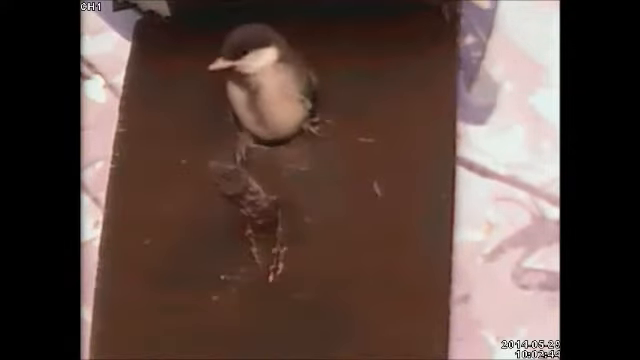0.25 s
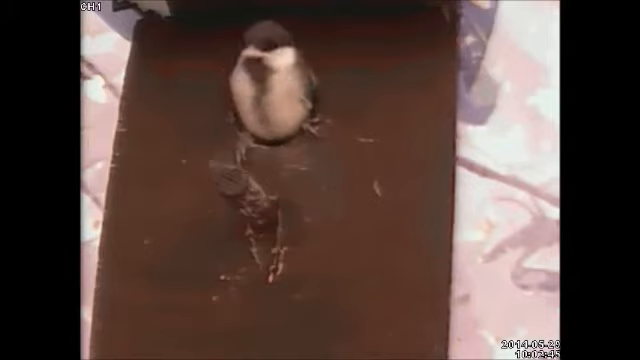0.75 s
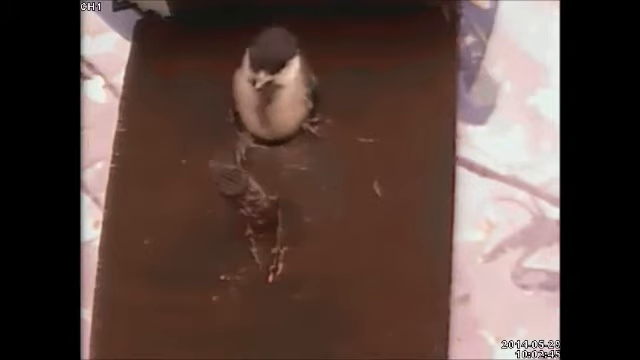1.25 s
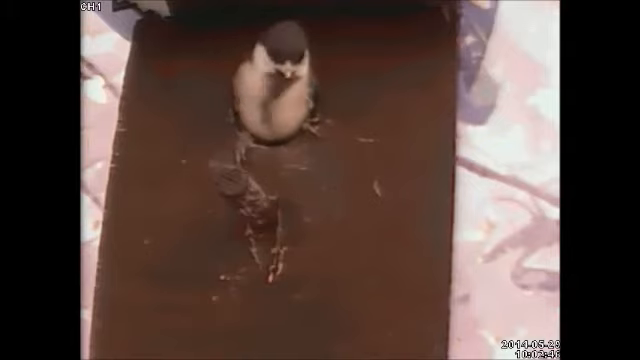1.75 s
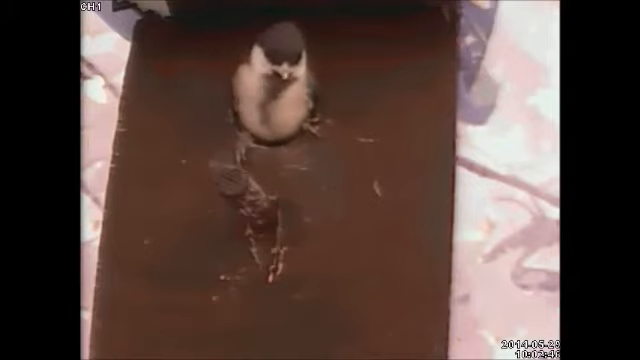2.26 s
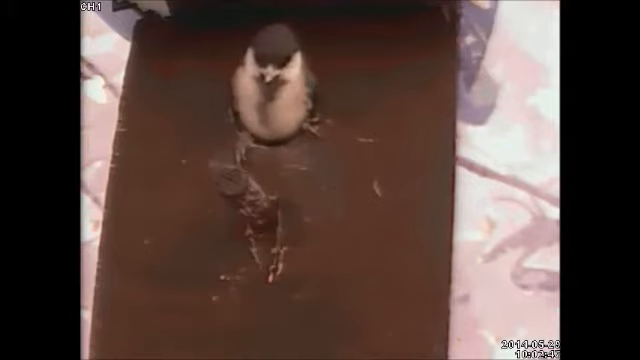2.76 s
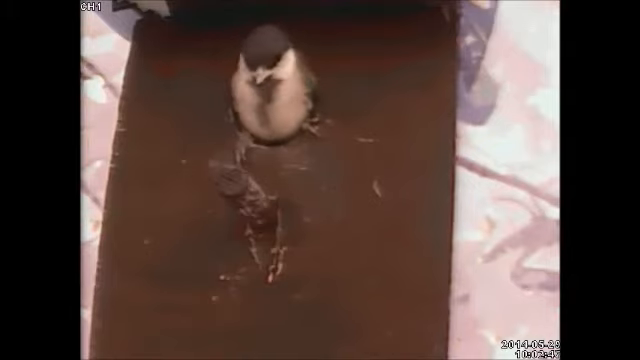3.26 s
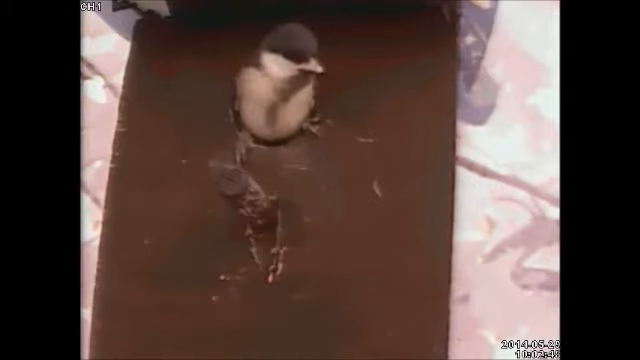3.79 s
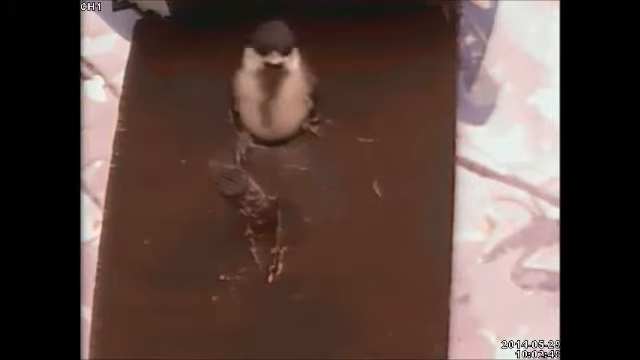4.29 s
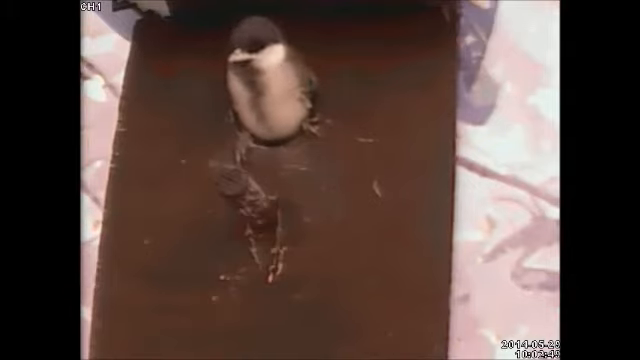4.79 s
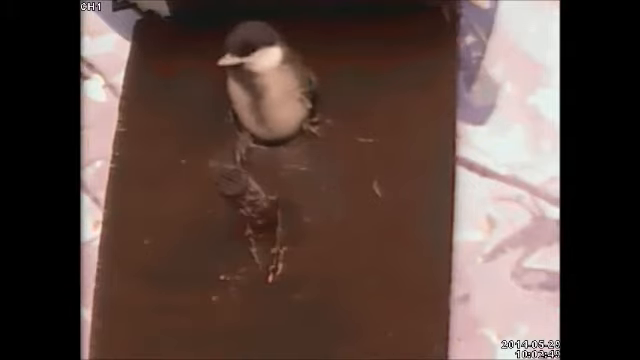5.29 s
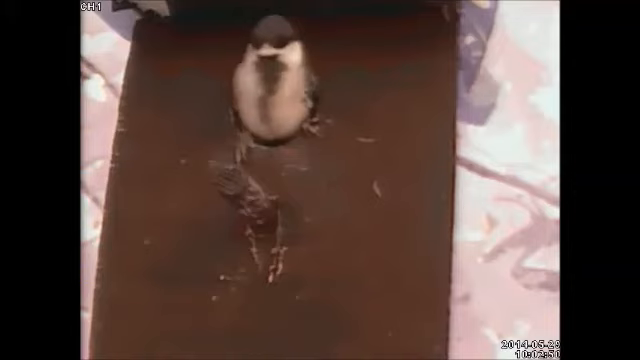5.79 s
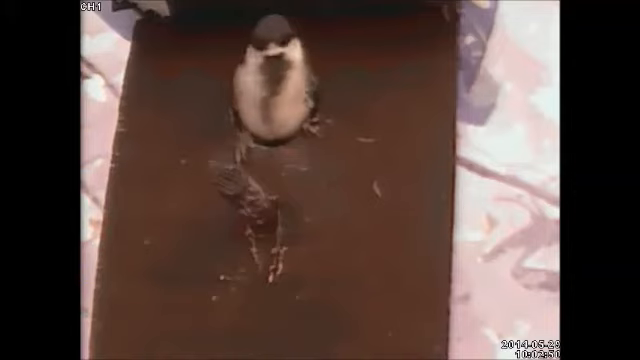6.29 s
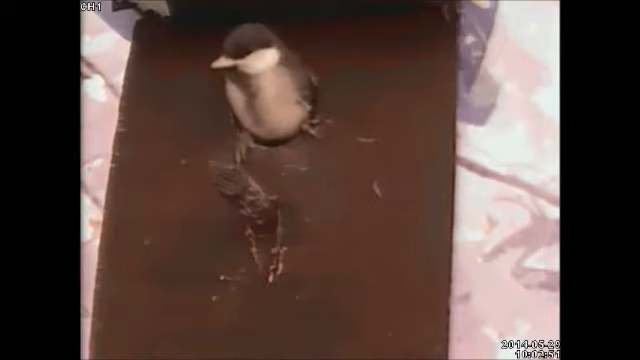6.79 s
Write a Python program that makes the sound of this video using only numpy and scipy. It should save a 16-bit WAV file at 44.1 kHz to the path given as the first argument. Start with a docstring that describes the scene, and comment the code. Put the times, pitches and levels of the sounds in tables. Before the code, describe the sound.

Close, raspy chattering from a small bird, twice, with light scuffs and claw clicks on wood, low rumble and faraway birdsong.

```python
"""A wooden nest box in a garden: a young great tit shuffles and gives two bursts of five harsh notes.
The two sides of its syrinx oscillate at different pitches, and their nonlinear coupling makes a buzz
of sum and difference tones. Claws click, feathers rustle and the beak snaps once.
The right microphone is inside the box, over a low rumble; the left one is outside, with distant birds,
faint air noise, mains hum and one metallic tap."""
import sys
import numpy as np
from scipy import signal
from scipy.fft import rfft, irfft
from scipy.io import wavfile
from scipy.ndimage import uniform_filter1d

SR = 44100
rng = np.random.default_rng(int(sys.argv[2]) if len(sys.argv) > 2 else 0)


def generate_wav(sig):
    """Save sig (samples, or channels by samples) to the path in sys.argv[1] as 16-bit PCM at SR."""
    pcm = np.round(np.clip(np.atleast_2d(sig).T, -1, 1) * 32767).astype(np.int16)
    wavfile.write(sys.argv[1], SR, pcm)


N = 310905
TREBLE_HZ, EDGE_HZ = 11900, 17000  # low-pass cutoffs: all but the beak snap; everything


def amp(db):
    """The decibel scale: 20 dB is a factor of ten in amplitude."""
    return 10 ** (np.asarray(db) / 20)


def unit(x):
    """Normalisation to rms 1."""
    return x / np.sqrt(np.mean(x ** 2) + 1e-20)


def gain_at(spectrum, hz):
    """Interpolation of a spectrum in dB along a log-frequency axis."""
    knots_hz, db = np.transpose(spectrum)
    return np.interp(np.log(abs(hz) + 1), np.log(knots_hz), db)


def add(mix, start_s, sound):
    """Superposition: a sound joins the mix at start_s."""
    part = mix[max(round(start_s * SR), 0):][:len(sound)]
    part += sound[:len(part)]


def noise(spectrum, size, treble_db=0):
    """Spectral shaping of white noise, with a treble shelf above 3 kHz; rms 1."""
    hz = np.fft.rfftfreq(size, 1 / SR)
    shelf_db = treble_db * hz ** 2 / (hz ** 2 + 3000 ** 2)
    return unit(irfft(rfft(rng.standard_normal(size)) * amp(gain_at(spectrum, hz) + shelf_db), size))


def wander(rate_hz, size):
    """Gaussian low-pass filtering turns noise into a smooth random curve of rms 1."""
    hz = np.fft.rfftfreq(size, 1 / SR)
    response = np.exp(-.5 * (hz / rate_hz) ** 2) * (hz > 0)
    return unit(irfft(rfft(rng.standard_normal(size)) * response, size))


def lowpass(x, hz):
    """Convolution with a windowed sinc: a steep low-pass on each channel."""
    taps = signal.firwin(255, hz, window=("kaiser", 8), fs=SR)
    return signal.oaconvolve(x, taps[None, :], "same", axes=-1)


# spectrum of the outdoor air: frequency_hz, relative_density_db
AIR_SPECTRUM = [(20, -18.5), (100, 0.5), (350, 1), (700, -1), (1500, -5.5), (3000, -10.5), (4200, -8.5),
                (6000, -13), (11500, -16.5), (12500, -47)]


def air(level_db=-58.5):
    """Stationary broadband noise: the faint hush outside."""
    return amp(level_db) * noise(AIR_SPECTRUM, N)


# spectrum of the rumble in the box: frequency_hz, relative_density_db
RUMBLE_SPECTRUM = [(10, -23), (28, -8), (65, -4.5), (100, 2), (140, 1.5), (185, -11), (260, -26.5),
                   (500, -36), (1000, -38.5), (1800, -44.5), (3000, -56), (8000, -60.5), (11500, -70.5),
                   (13000, -81)]


def rumble(level_db=-35.5, waver_db=.28):
    """Low-frequency noise under slight random amplitude modulation."""
    return amp(level_db + waver_db * wander(5.4, N)) * noise(RUMBLE_SPECTRUM, N)


# partials of the mains hum: harmonic_number, level_db
HUM_HARMONICS = [(1, -76.5), (2, -67), (3, -64), (4, -62.5), (5, -62.5), (6, -63.5), (7, -64.5), (8, -67),
                 (9, -66), (10, -68), (11, -72), (12, -77.5), (13, -82.5)]


def hum(mains_hz=49.95):
    """Electrical interference: the outside microphone's lead picks up mains harmonics."""
    cycles = mains_hz * np.arange(N) / SR
    partials = (amp(db) * np.sin(2 * np.pi * (k * cycles + rng.random())) for k, db in HUM_HARMONICS)
    return np.sqrt(2) * sum(partials)


def chirp(length_s, from_hz, to_hz, level_db, warble, bend=1, trill_hz=38, flutter_hz=150):
    """Frequency modulation: a far bird's warbling glide. A bend under 1 moves early, then lingers."""
    t = np.arange(0, length_s, 1 / SR)
    trill = .42 * np.sin(2 * np.pi * (trill_hz * t + rng.random()))
    flutter = .45 * wander(flutter_hz, SR)[:len(t)]
    glide_hz = from_hz * (to_hz / from_hz) ** ((t / length_s) ** bend)
    hz = glide_hz * (1 + warble * (trill + flutter))
    tone = np.sqrt(2) * np.sin(2 * np.pi * np.cumsum(hz) / SR)
    return amp(level_db) * tone * signal.windows.tukey(len(t), .4)


# one far bird's buzzy, falling call, about once a second: start_s, source_level_db
FALLING_CALLS = [(0.067, -48.5), (1.039, -50.5), (2.132, -50.5), (3.304, -49.5), (4.394, -48.5),
                 (5.372, -46.5), (6.332, -49.5)]
# whistles of other far birds: start_s, length_s, from_hz, to_hz, source_level_db
FAR_WHISTLES = [(0, 0.4, 2360, 2150, -60.5), (.468, .037, 3770, 5070, -57), (0.819, .13, 5790, 5200, -55.5),
                (1.333, 0.055, 3200, 2170, -51.5), (2.115, .052, 1845, 2260, -58),
                (2.46, .1, 1900, 2700, -56), (2.585, .1, 2705, 2310, -46.5),
                (2.724, 0.075, 1872, 1815, -45.5), (2.815, .24, 2120, 2230, -43),
                (3.094, 0.075, 3224, 2907, -39), (5.025, 0.072, 2042, 4300, -47),
                (5.417, 0.75, 1900, 2150, -63), (5.878, 0.5, 2280, 2040, -61)]


def far_birds(warble_hz_per_octave=1400, max_warble_hz=420, pips_per_s=1.3):
    """Frequency sweeps: a repeated falling call, scattered whistles and faint, thin contact notes."""
    out = np.zeros(N)
    for start_s, db in FALLING_CALLS:
        add(out, start_s, chirp(.115, from_hz=5400, to_hz=3200, level_db=db, warble=.16, bend=.7))
    for start_s, length_s, from_hz, to_hz, db in FAR_WHISTLES:
        # the wider a whistle glides, the deeper it warbles
        depth_hz = min(warble_hz_per_octave * abs(np.log2(to_hz / from_hz)), max_warble_hz)
        add(out, start_s, chirp(length_s, from_hz, to_hz, db, depth_hz / np.sqrt(from_hz * to_hz)))
    for when, pitch in rng.random((round(pips_per_s * N / SR), 2)):
        pip_hz = 5600 * 2 ** (.25 * (2 * pitch - 1))  # within a quarter octave either way
        add(out, when * N / SR, chirp(.035, pip_hz, .72 * pip_hz, level_db=-64, warble=.04))
    return out


def garden(birds, direct_db=-4, wall_echo_db=-14, wall_delay_s=.086, scatter_db=-2.5, t60_s=.42):
    """Reflection and scattering: a wall repeats the far birds and trees smear them."""
    out = birds.copy()
    add(out, wall_delay_s, amp(wall_echo_db) * birds)
    t = np.arange(SR) / SR
    echoes = rng.standard_normal(SR) * amp(-60 * t / t60_s) * (t > .006)
    scattered = signal.oaconvolve(out, echoes / np.linalg.norm(echoes))[:N]
    return amp(direct_db) * out + amp(scatter_db) * scattered


# spectrum of contact with the wooden floor: frequency_hz, relative_density_db
WOOD_SPECTRUM = [(40, 1), (200, 18), (400, 5.5), (1400, -4), (2200, -10.5), (4000, -19), (8000, -26.5),
                 (11500, -44.5), (16500, -16.5)]


def rub(length_s, level_db, treble_db):
    """Sliding friction: one swell of grainy noise."""
    size = int(length_s * SR)
    grain = unit(amp(2.5 * wander(150, size)) * noise(WOOD_SPECTRUM, size, treble_db))
    return amp(level_db) * grain * np.sin(np.linspace(0, np.pi, size))


# feet and feathers on the floor: start_s, length_s, level_db
FLOOR_SCUFFS = [(.275, 0.053, -38), (.413, .055, -44.5), (.586, .05, -37.5), (.86, .1, -43),
                (3.687, 0.13, -35.5), (4.234, 0.095, -41), (4.443, 0.094, -46.5), (5.65, .064, -43.5),
                (6.526, .18, -48.5)]


def shuffles():
    """Friction on wood as the bird shifts about."""
    out = np.zeros(N)
    for start_s, length_s, db in FLOOR_SCUFFS:
        add(out, start_s, rub(length_s, db, treble_db=4))
    return out


# strikes of claw and beak: start_s, level_db, treble_db
CLAW_CLICKS = [(.287, -32, -6), (1.712, -33, -13), (2.353, -33, -15), (4.335, -35, 6), (4.538, -37, 14)]


def clicks(decay_s=.0052):
    """Heavily damped impacts: claw and beak make short, dry clicks."""
    out, t = np.zeros(N), np.arange(SR // 20) / SR
    for start_s, db, treble_db in CLAW_CLICKS:
        add(out, start_s, amp(db) * np.exp(-t / decay_s) * noise(WOOD_SPECTRUM, len(t), treble_db))
    return out


# tones of the coupled voices: low_voice_multiple, high_voice_multiple
COMBINATION_TONES = [(0, 2), (2, 0), (1, 1), (1, 0), (0, 1), (-1, 1), (-2, 2), (2, -1), (-1, 2), (3, -2),
                     (3, 0), (2, 1), (-1, 3), (4, -1), (0, 3), (3, -1), (2, 2), (4, 0)]
# strength of each of those tones: relative_level_db
COMBINATION_DB = [1.5, -3.5, -7, -2, -1.5, -1, -4, -3, -12.5, -7, -8, -4.5, -19, -14, -7.5, -16, -3, -21.5]
# response of throat, beak and box: frequency_hz, gain_db
THROAT_RESPONSE = [(100, -11), (550, -3), (1100, -3.5), (2000, -7), (3300, -12), (3800, -4), (4400, -2.5),
                   (4800, -6.5), (5130, -1), (5520, -1.5), (6100, 2.5), (6800, 0.5), (7500, -5.5),
                   (8700, -10.5), (10200, -20), (11300, -12.5), (11900, -29.5)]


def syrinx(low_hz, high_hz, rough, buzz_db, climb_left, crest, unsettled, shimmer):
    """Nonlinear coupling: two voices yield tones at sums and differences of their multiples."""
    size = len(low_hz)
    # a rough note has weaker fundamentals, and its difference tone jumps to the octave
    rough_db = 20.5 * (rough - .21)
    voice = np.zeros(size)
    for (m, n), db in zip(COMBINATION_TONES, COMBINATION_DB):
        hz = m * low_hz + n * high_hz
        tone_db = db + gain_at(THROAT_RESPONSE, hz)
        if m + n == 0:  # difference tones need both voices at full swing
            tone_db += buzz_db + (-rough_db if n == 1 else rough_db) - 7 * crest - 8 * climb_left
        if m + n == 1:  # a soft start is rich in the fundamentals
            tone_db += 13 * climb_left * (m * n == 0) - rough_db * (1 - climb_left)
        if (m, n) == (0, 1):  # the high voice whistles through at the crest
            tone_db += 7 * crest ** 2 * unsettled
        if m + n == 2:  # the low voice leads the attack
            tone_db += 5 * unsettled * (m - 1)
        if m + n > 2:  # upper partials only come with full pressure
            tone_db -= 8 * climb_left
        flutter = np.exp(shimmer * wander(230, size))
        voice += amp(tone_db) * flutter * np.cos(2 * np.pi * (np.cumsum(hz) / SR + rng.random()))
    # levelled, so that air pressure sets the loudness
    return unit(voice / np.sqrt(uniform_filter1d(voice ** 2, size=400)))


# spectrum of a note's air noise: frequency_hz, relative_density_db
BREATH_SPECTRUM = [(30, 3.5), (150, 5.5), (300, 3), (900, 1.5), (1600, -3.5), (3000, -11.5), (4700, -12.5),
                   (6000, -2), (7200, -12.5), (9000, -14), (11500, -19), (13000, -51.5)]


def note(start_s, end_s, level_db, low_hz, high_hz, arch, rough, buzz_db,
         scoop=.23, sag=.024, drift=.0094, jitter=.016, onset_rough=.7, arch_s=.007, fade_s=.017):
    """Airflow-driven oscillation: two voices scoop up through a rough arch, then settle to a buzz."""
    t = np.arange(start_s, end_s, 1 / SR)
    size = len(t)
    crest_s = start_s + .026 + .032 * np.exp(-abs(arch) / .05)  # flat notes climb for longer
    climb_left = np.clip((crest_s - t) / (crest_s - start_s), 0, 1)
    crest = np.exp(-.5 * ((t - crest_s) / arch_s) ** 2)
    closing = np.clip((t - end_s + fade_s) / fade_s, 0, 1)
    # the membranes vibrate unevenly until the arch has passed, and again as the pressure fails
    unsettled = np.clip((crest_s + .02 - t) / .0054, 0, 1) * min(abs(arch) * 8, 1)
    roughness = rough + (onset_rough - rough) * unsettled + .55 * closing
    glide = 1 - scoop * climb_left ** 1.5 - sag * closing ** 2 + drift * wander(32, size)
    shake = jitter * roughness * (1 - .64 * crest)
    low = low_hz * glide * (1 + .76 * arch * crest) * (1 + .5 * shake * wander(300, size))
    high = high_hz * glide * (1 + arch * crest) * (1 + shake * wander(350, size))
    voice = syrinx(low, high, rough, buzz_db, climb_left, crest, unsettled, shimmer=.63 * roughness)
    breath = amp(-4) * (.13 + roughness) * noise(BREATH_SPECTRUM, size)
    # the rush of air shakes the nearby microphone, most of all just after the crest
    gust = np.exp(-.5 * ((t - crest_s - .005) / .013) ** 2)
    buffet = amp(-12.5) * (.63 + 2.1 * gust + 2.9 * closing) * wander(120, size)
    attack = np.minimum((t - start_s) / .005, 1)
    effort = amp(level_db - 22 * climb_left ** 1.16) * attack * (1 - closing)
    return effort * (voice + breath + buffet)


# the tit's notes: start_s, end_s, level_db, low_pitch_hz, high_pitch_hz, pitch_arch_fraction,
# roughness_fraction, difference_tone_db
TIT_NOTES = [(.972, 1.035, -18.5, 2336, 2950, 0.013, .42, -16),
             (1.075, 1.151, -14.5, 2574, 3076, 0.084, 0.51, 1),
             (1.188, 1.266, -16, 2586, 3090, 0.24, 0.42, 0.5),
             (1.299, 1.381, -18.5, 2586, 3089, 0.32, .29, 3.5),
             (1.442, 1.524, -19, 2561, 3054, 0.34, 0.24, 1),
             (3.216, 3.279, -10, 2558, 3023, .02, 0.18, 4.5),
             (3.335, 3.42, -12.5, 2700, 3252, .12, 0.18, 1.5),
             (3.452, 3.546, -13, 2775, 3354, 0.33, .21, -.5),
             (3.584, 3.68, -12.5, 2742, 3319, 0.38, .21, 1.5), (3.74, 3.84, -15, 2700, 3295, .43, .2, 1)]


def tit(ring_db=-17, t60_s=.029):
    """Reverberation in a small enclosure: both bursts, with the faint, short ring of the box."""
    out = np.zeros(N)
    for row in TIT_NOTES:
        add(out, row[0], note(*row))
    t = np.arange(SR // 10) / SR
    ring = rng.standard_normal(len(t)) * amp(-60 * t / t60_s) * (t > .001)
    return out + amp(ring_db) * signal.oaconvolve(out, ring / np.linalg.norm(ring))[:N]


def rustles(lead_s=.005, relative_db=-22):
    """Friction of feathers: a brief, bright rustle as each note ends."""
    out = np.zeros(N)
    for _, end_s, note_db, *_ in TIT_NOTES:
        add(out, end_s - lead_s, rub(.024, note_db + relative_db, treble_db=24))
    return out


# modes of a thin metal object: frequency_hz, relative_level_db, t60_s
METAL_MODES = [(2100, 11, .08), (3920, -7, .13), (4970, -13, 0.55), (5800, 3, 0.18), (7800, -3, 0.52),
               (8500, 6, 0.31), (9350, 5, 0.18), (9275, -18, .15), (10400, -18, 0.1)]


def tap(start_s=1.547, ring_db=-39, rattle_db=-46, rattle_s=.05):
    """Modal vibration: thin metal, tapped outside, rings and rattles briefly."""
    out, t = np.zeros(N), np.arange(SR // 3) / SR
    ring = sum(amp(db - 60 * t / t60_s) * np.sin(2 * np.pi * hz * t) for hz, db, t60_s in METAL_MODES)
    rattle = np.exp(-t / rattle_s) * noise(AIR_SPECTRUM, len(t), treble_db=21)
    attack = np.minimum(t / .0008, 1)
    add(out, start_s, attack * (amp(ring_db) * ring / abs(ring).max() + amp(rattle_db) * rattle))
    return out


# spectrum of the beak snap: frequency_hz, relative_density_db
BEAK_SPECTRUM = [(1000, -20), (5000, -9.5), (8000, -7.5), (12000, -8), (16500, -16)]


def snap(start_s=3.342, level_db=-5, decay_s=.00035):
    """A short impulse has a broad spectrum: the beak snaps once as it opens."""
    out, t = np.zeros(N), np.arange(SR // 50) / SR
    add(out, start_s, amp(level_db) * np.exp(-t / decay_s) * noise(BEAK_SPECTRUM, len(t)))
    return out


def scene(inward_db=-15, outward_db=-56):
    """Transmission loss: a little birdsong crosses the wall between garden (left) and box (right)."""
    near, far = tit(), garden(far_birds())
    outside = far + tap() + hum() + air() + amp(outward_db) * near
    inside = near + rumble() + shuffles() + rustles() + clicks() + amp(inward_db) * far
    out = lowpass(np.array([outside, inside]), TREBLE_HZ)
    out[1] += snap()
    return out


def record(dry, ceiling=.7):
    """Soft saturation: the small microphones round off the loudest peaks; then the band limit."""
    distortion = ceiling * np.tanh(dry / ceiling) - dry
    return lowpass(dry + lowpass(distortion, TREBLE_HZ), EDGE_HZ)


dry = scene()
out = record(dry)
generate_wav(out)
```